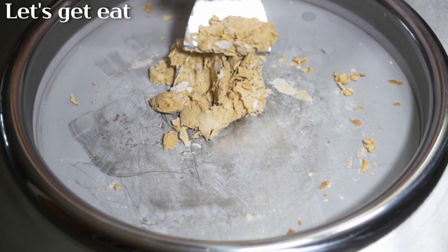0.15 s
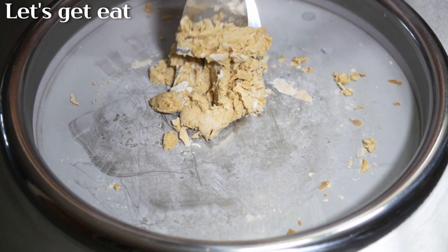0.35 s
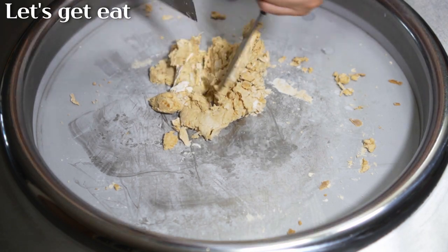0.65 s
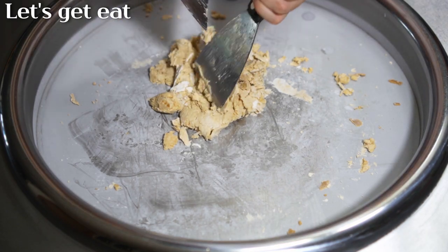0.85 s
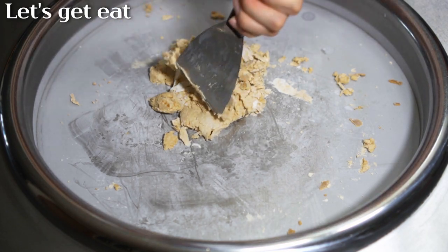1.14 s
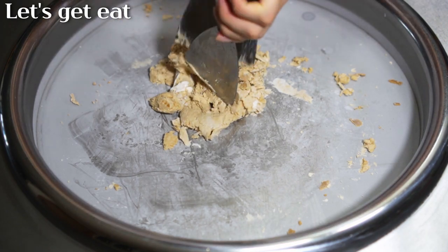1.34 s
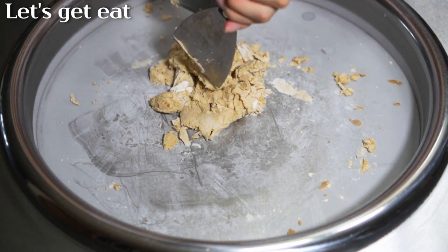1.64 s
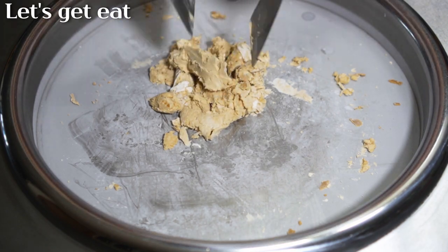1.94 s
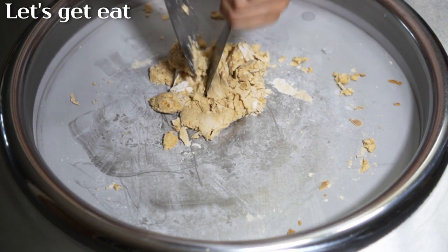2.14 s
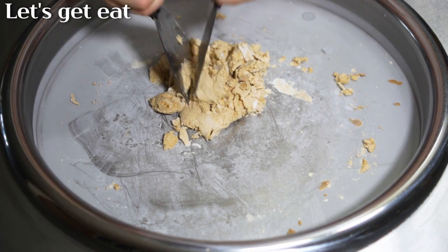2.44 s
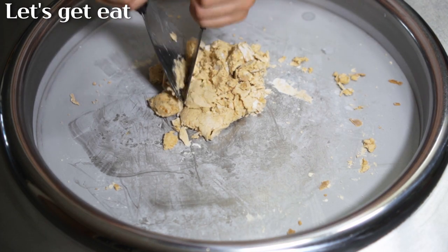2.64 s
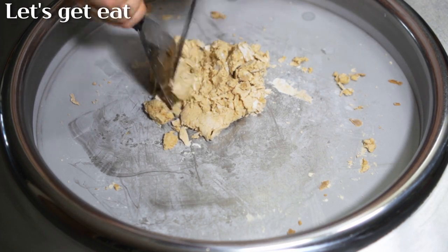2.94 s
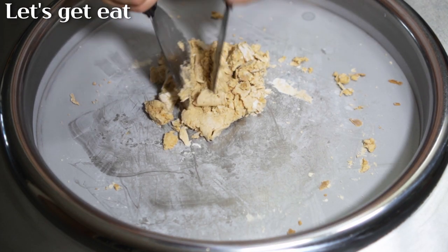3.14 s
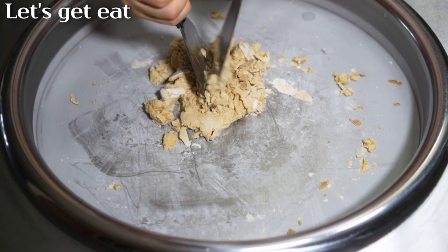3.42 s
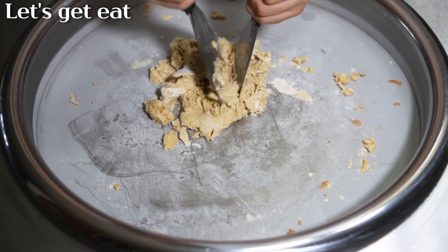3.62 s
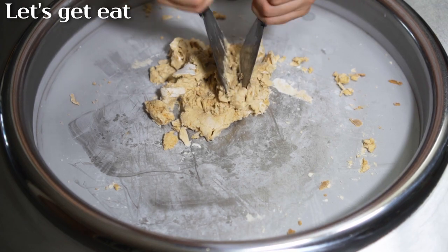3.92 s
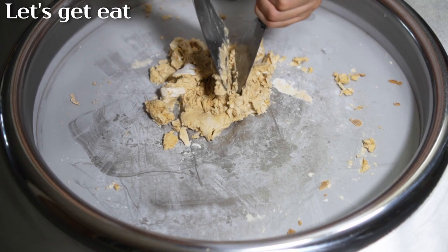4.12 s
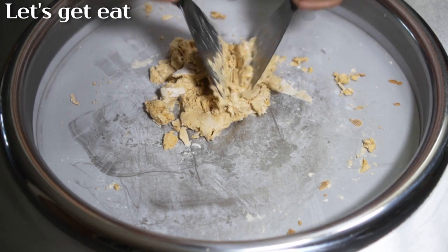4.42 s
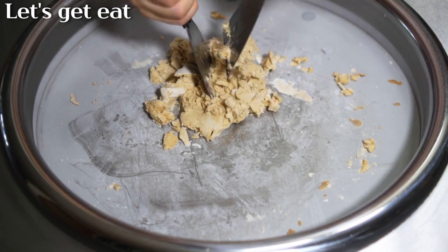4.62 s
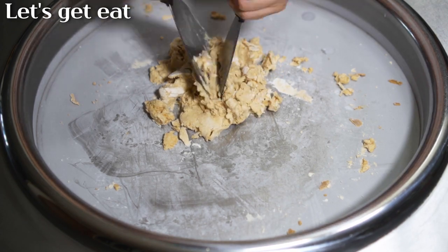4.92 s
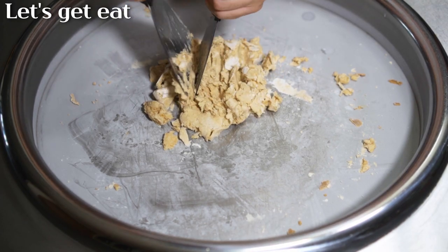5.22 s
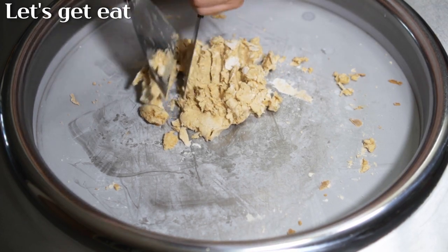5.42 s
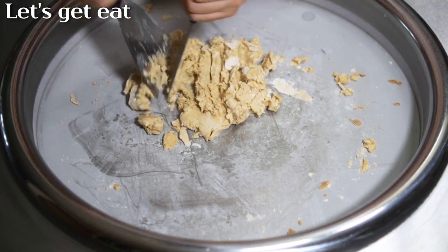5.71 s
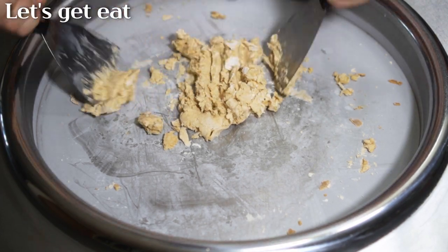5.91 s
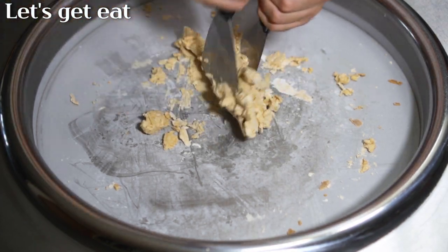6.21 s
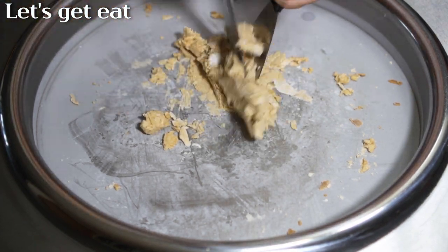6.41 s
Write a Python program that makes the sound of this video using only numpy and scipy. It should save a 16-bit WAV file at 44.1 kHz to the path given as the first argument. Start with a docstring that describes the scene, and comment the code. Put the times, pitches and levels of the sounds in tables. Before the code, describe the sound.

Close, wide stereo view of a chilled steel pan. First come isolated thin blade clinks and dry scrapes, then a busy run of hard metallic chops mixed with cushioned thumps in thick frozen paste. Short rattling slides follow the blows, and a brief metallic ring fades quickly in the room. A few gaps open, more chops follow, then only the low throbbing compressor hum and faint fan hiss remain.

```python
"""Ice cream chopped on a chilled plate

Two steel spatulas chop and scrape half-frozen ice cream on a chilled steel plate.
A blade that cuts through cracks on the steel: shaped click clusters filtered by blade modes.
One cushioned by the mixture only thuds the plate: a short swell of decaying cosines.
The cooling unit hums and hisses underneath: wavering tones and coloured noise.
Bands of the sound drift out of phase between the ears."""
import sys
import numpy as np
from scipy import signal
from scipy.fft import rfft, irfft
from scipy.io import wavfile
from scipy.ndimage import uniform_filter1d

SR = 44100
rng = np.random.default_rng(int(sys.argv[2]) if len(sys.argv) > 2 else 0)


def int16_out(signal):
    """Quantize to a 16-bit WAV file."""
    q = np.round(np.clip(np.atleast_2d(signal).T, -1, 1) * 32767)
    wavfile.write(sys.argv[1], SR, q.astype(np.int16))


N = 289296
T = np.arange(N) / SR

# Levels of blade and plate sounds are before the gains in scene().

# compressor tones: pitch_hz, level_db_rms
HUM = [(48.8, -54), (97.6, -48), (193.8, -57), (1061, -61.5)]
# fan noise: freq_hz, density_db_per_hz
FAN = [(20, -100), (33, -95), (70, -75), (140, -79.5), (190, -75.5), (320, -81.5), (450, -84), (850, -84),
       (1300, -90.5), (2000, -95.5), (3000, -99), (4600, -103), (7000, -110), (9000, -111), (15500, -123)]
# whistles of the cooling circuit: centre_hz, width_hz, boost_db
WHISTLES = [(4800, 24, 13), (6030, 79, 13.5), (8400, 150, 4.5), (9000, 120, 1), (9500, 80, -2),
            (12400, 300, 9)]
# cabinet rumble as the hands lean on it: centre_s, level_db
LEANS = [(1.3, -47), (1.65, -46.5), (2.15, -40.5), (2.5, -38), (3.27, -44), (3.78, -40), (4.16, -37.5),
         (4.96, -39), (5.18, -43.5), (5.56, -49)]
LEAN_S, RUMBLE_DB = 0.094, -72.5  # half-length of a lean; rumble at rest

# churning of the mixture between blows: time_s, level_db
CHURN = [(0, -89), (.9, -60.5), (1.85, -56.5), (2.9, -43), (3.65, -56.5), (4, -46.5), (4.5, -56),
         (5.8, -66.5), (6.56, -88)]
# colour of the churning: freq_hz, gain_db
PASTE = [(150, 4), (330, 10), (800, 3.5), (1500, 0.5), (2500, -11), (4500, -15), (6500, -26), (9000, -19),
         (12000, -27.5), (16000, -35)]

# decay of pan and room: freq_hz, t60_s
DECAY = [(150, 0.64), (400, 0.35), (1000, 0.43), (2700, 0.31), (7000, 0.33), (15000, 0.13)]

# overall colour of steel on steel: freq_hz, gain_db
STEEL = [(200, -4.5), (400, 7.5), (700, 0), (1100, -7.5), (1500, 5), (2200, -5), (4400, -11), (5300, -18),
         (7500, -15), (9300, -17), (11500, -21.5), (16000, -32)]
# resonances of a blade on the pan: centre_hz, width_hz, boost_db
BLADE = [(500, 103, 9.5), (648, 75, 4), (864, 76, 5), (1265, 65, 8.5), (1540, 89, -3), (1860, 310, 5.5),
         (2150, 41, 5.5), (2680, 660, 4), (3870, 140, 3.5), (4400, 540, 2.5), (2280, 27, 2.5),
         (2520, 40, 1), (2746, 99, 4), (2860, 49, 4.5), (3320, 36, -0.5), (3570, 47, 1.5), (4890, 78, 2),
         (6190, 110, 2.5), (7200, 130, 4), (8580, 190, 5), (9030, 120, 3), (9350, 520, 2.5),
         (10950, 390, 4), (12800, 210, 3)]
# resonances of a blade held in the air: centre_hz, width_hz, boost_db
FREE_BLADE = [(980, 120, 7.5), (1540, 130, 1.5), (2300, 120, 10), (3300, 83, 6), (3900, 140, 8.5),
              (4400, 160, 10.5), (5010, 160, 9), (6500, 200, 5), (7200, 260, 1), (8050, 140, 3),
              (9000, 160, 8), (9730, 250, 7.5), (12100, 300, 1)]

# a blade drags and chatters: start_s, length_s, level_db, chatter_hz, width_hz
SCRAPES = [(0.62, 0.13, -85, 1700, 1200), (0.88, 0.2, -69, 1600, 1500), (1.06, 0.15, -69, 1800, 1000),
           (0.3, 0.057, -46, 3500, 7500), (1.311, 0.03, -56, 2420, 3400), (0.978, 0.029, -69, 3200, 500),
           (1.349, 0.039, -38.5, 3600, 6900), (1.423, 0.12, -49.5, 4000, 8200),
           (1.425, 0.051, -57, 7600, 700), (1.443, 0.079, -55.5, 1250, 600),
           (1.475, 0.064, -53, 2000, 2000), (1.733, 0.069, -51, 3170, 6000), (1.7, 0.06, -56, 1400, 600),
           (1.837, 0.083, -58.5, 1450, 790), (1.96, 0.13, -70, 1700, 700), (2.201, 0.057, -47, 4900, 1600),
           (4.259, 0.023, -48, 5400, 2500), (2.111, 0.027, -54.5, 2100, 3500),
           (2.56, 0.03, -58, 1800, 3000), (5.175, 0.058, -43.5, 640, 300), (5.685, 0.054, -40, 2500, 1600),
           (5.503, 0.05, -39.5, 2750, 400), (3.428, 0.044, -53, 484, 270), (5.925, 0.022, -51, 610, 1100),
           (2.197, 0.16, -45.5, 1800, 4300), (2.859, 0.074, -35.5, 1880, 480),
           (2.874, 0.031, -40, 1900, 3000), (2.865, 0.04, -37.5, 920, 250), (2.6, 0.043, -45, 1080, 220),
           (3.39, 0.035, -47, 1200, 2300), (3.862, 0.04, -56, 1200, 1800), (4.062, 0.055, -41.5, 760, 690),
           (4.25, 0.045, -43, 790, 600), (5.657, 0.022, -48, 900, 1400), (3.914, 0.047, -45, 1700, 1500),
           (5.34, 0.048, -42, 1200, 160), (5.383, 0.05, -57, 7400, 3800), (5.5, 0.041, -33.5, 465, 340),
           (5.512, 0.059, -41.5, 1360, 130), (5.676, 0.06, -38, 420, 220), (5.956, 0.043, -44.5, 840, 1060),
           (5.965, 0.12, -51, 9400, 700), (5.981, 0.12, -48, 5500, 11400), (6.043, 0.018, -48, 5470, 10000),
           (6.01, 0.049, -49.5, 3900, 660)]
# after each chop the edge slides on, the louder the more it rings on
SLIDE_LAG_S, SLIDE_S, SLIDE_DB, SLIDE_HZ, SLIDE_WIDTH_HZ = .006, 0.088, -11.5, 1514, 1060

# blow cushioned by the mixture: peak_s, push_db, pitch_hz
THUDS = [(2.269, -30, 240), (2.3596, -28.5, 256), (2.6889, -23, 260), (3.043, -22, 266), (3.2193, -30, 238),
         (3.82, -30.5, 278), (3.9593, -21, 221), (4.1137, -22, 238), (4.791, -27.5, 246),
         (4.955, -27.5, 263), (5.0229, -30, 204), (5.1174, -18, 256), (5.2664, -24, 250), (5.578, -26, 234),
         (5.9943, -32, 275)]
# drum modes of the plate: pitch_hz, level_db (relative to the push), t60_s
PLATE = [(171, -21.5, 0.24), (196.1, -16.5, 0.36), (238, -20, 0.5), (306, -18, 0.12), (482, -27, 0.27)]
# each chop also pushes the plate, just after the crack
THUD_LAG_S, THUD_HZ = 0.00562, 266
# the push dies away more slowly on bare steel than under the mixture
THUD_T60_S, CUSHIONED_T60_S = 0.069, 0.06

# blades glance off each other: contact_s, crack_db, brightness_db, ring_on_db (relative),
# partials favoured by the point of contact [centre_hz, width_hz, boost_db]
CLINKS = [(0.3043, -23.5, 3.5, -25, [(1604, 110, 20), (3900, 150, 2), (8450, 200, 7), (9070, 170, 13),
          (11400, 180, 1)]), (0.452, -58.5, 11.5, -20, [(9000, 200, 4)]),
          (0.993, -50.5, -3, -26, [(3200, 200, 16)]), (1.3518, -22, 1, -16.5, [(2280, 33, 17.5),
          (3450, 130, 11), (4540, 80, -3), (9650, 90, 8)]), (1.4184, -25, 2.5, -27, [(1310, 120, 32),
          (2440, 120, 9), (4500, 130, 7), (7420, 350, 17), (12100, 400, 16), (12850, 120, 14)]),
          (1.726, -29, 4, -16, [(1470, 67, 9), (2860, 56, 13), (3900, 130, 8), (9520, 150, 13),
          (11400, 300, 7), (14030, 3000, 15)]), (2.1442, -24.5, -0.5, -16, [(915, 130, 13), (1400, 78, 6),
          (3680, 150, 12), (4330, 140, 6), (7200, 200, 15), (7900, 220, 16), (9400, 140, -3)]),
          (4.228, -28.5, 7, -18.5, [(2520, 130, 10), (4800, 110, -8), (5590, 140, 18), (8030, 320, 13),
          (10600, 190, 15)]), (5.981, -33.5, 8, -13, [(1150, 195, 9), (9030, 190, 12)])]
# blade chops through to the plate: contact_s, crack_db, brightness_db, ring_on_db (relative),
# note_hz, note_db, overtone_hz, overtone_db, boom_db (lowest band), thud_db
CHOPS = [(2.187, -21, -4, -9, 1550, 10, 4400, 9.5, -1.5, -25),
         (2.589, -20, -2.5, -15.5, 1290, 11.5, 9500, -7, -3, -21),
         (2.7633, -20.5, -1, -16.5, 1284, 6.5, 7200, -7, -3.5, -22.5),
         (2.858, -20.5, -10.5, -15, 1740, 14, 2520, 6, -6, -22),
         (2.945, -20.5, 2.5, -13, 1280, 7.5, 9500, 3, -0.5, -22.5),
         (3.0996, -20, 2.5, -13, 1300, 10, 7160, 9, 1, -21.5),
         (3.259, -26, -7.5, -21.5, 1540, 40, 3100, -6, -1.5, -23.5),
         (3.423, -29, -7, -16.5, 2230, 11, 2980, 14, 4.5, -21),
         (3.863, -42.5, -12, -21, 1450, 6, 2700, -4, -2, -35),
         (3.8983, -21.5, -6.5, -12, 1560, 7.5, 3620, 9, -2, -20),
         (4.0575, -22.5, -4.5, -13, 1860, 2, 2660, -1, -1.5, -20),
         (4.247, -22, 2, -20, 1580, 11, 3830, 3, -3.5, -24),
         (4.517, -28.5, 1.5, -19.5, 1702, 9, 2630, -15, 3, -31),
         (4.6717, -55.5, -21, -22, 606, 17, 1300, -3, 13, -22),
         (4.8674, -41.5, -10, -19, 1500, 10, 3000, 10, -6, -23.5),
         (5.183, -28, -4.5, -21, 1550, 1, 3760, 15, -2, -23),
         (5.3372, -27, 1, -19, 1290, 5, 3040, 16, 3, -22),
         (5.4122, -43, -21, -17.5, 1350, 6, 3000, -4, 3, -21.5),
         (5.499, -21, 4, -15.5, 1290, -13, 3660, 8.5, 0.5, -22),
         (5.6748, -21.5, 4, -14.5, 1410, 6, 4080, 6, 1, -21.5),
         (5.9537, -30.5, 9.5, -16, 1044, 19, 2970, 11, 8, -37)]
NOTE_WIDTH_HZ, OVERTONE_WIDTH_HZ = 110, 140  # a pressed blade rings only briefly
# noise lead-in before the peak; frequency grid of one blow
LEAD_IN_S, BLOW_HZ = .03, np.fft.rfftfreq(8192, 1 / SR) + 1
# edges of the four bands of a blow: edge_hz
BAND_EDGES_HZ = [400, 1100, 2800, 6000, 16000]
# balance of a chop, bands low to high: level_db
CHOP_DB = [0.57, -0.46, -4, -12.5]
# balance of a clink, bands low to high: level_db
CLINK_DB = [-8, -2.6, -1.4, -6.5]
# share of the brightness taken by each band: share (ratio)
BRIGHT_SHARE = [-0.4, -0.013, 0.023, 1]

# steady phase lead of the left ear: freq_hz, lead_rad
LEAD = [(20, 0.55), (450, 0.46), (3000, 0.69), (4800, 0.97), (7000, 0.78)]
# sliding bands out of phase between the ears: time_s, low_hz, high_hz, left_lead_rad
EARLY_BAND = [(0, 380, 1870, 2.51), (1.05, 370, 2140, 2.36), (1.4, 376, 1225, 2.4), (2.68, 400, 1356, 2.38),
              (3.05, 400, 550, 2.7)]
# same columns: time_s, low_hz, high_hz, left_lead_rad
LATE_BAND = [(3.1, 3430, 3760, 3.9), (3.8, 2870, 4623, 3.5), (4.08, 3100, 4250, 3.4),
             (4.44, 3320, 3950, 3.2), (4.51, 2960, 3300, 3.3), (4.6, 2460, 3450, 3.14),
             (4.8, 2300, 2890, 3.14), (5.05, 2098, 2876, 3.2), (5.12, 1996, 3500, 3.14),
             (5.45, 1530, 3300, 3.14), (5.68, 1110, 3180, 3.14), (5.83, 1410, 3100, 3.14),
             (5.961, 1154, 2450, 3.14), (6.56, 1220, 2340, 3.14)]
# same columns: time_s, low_hz, high_hz, left_lead_rad
HIGH_BAND = [(1.3, 5850, 6500, 5.3), (2.2, 5850, 6700, 4.61), (2.6, 5460, 6460, 3.4),
             (3.05, 5500, 6900, 3.2)]
# treble swings out of phase and back: time_s, left_lead_rad
TREBLE_LEAD = [(1.3, 1), (1.73, -1.4), (1.85, -2.5), (2.38, -2.5), (2.5, -0.7), (2.85, -2), (3, -2),
               (3.1, 1.24), (3.5, 0.2), (3.62, -1.5), (4.1, -1.5), (4.35, -1)]
TREBLE_HZ, EDGE_HZ = 6530, 15900  # bottom of the treble; top of the whole sound
BASS_HZ, BASS_STEP_S = 400, 3.9  # the bass stays in step until this time


def amp(db):
    """Decibels to gain."""
    return 10 ** (np.asarray(db) / 20)


def evened(x):
    """Scales to an rms of one."""
    return x / np.sqrt(np.mean(x ** 2) + 1e-20)


def read(points, hz):
    """Reads a table along a logarithmic frequency axis."""
    f, value = np.transpose(points)
    return np.interp(np.log(hz + 1), np.log(f + 1), value)


def bumps(peaks, hz):
    """Decibels added by a set of resonances."""
    return sum(db / (1 + (2 * (hz - f) / width) ** 2) for f, width, db in peaks)


def resonance(hz, centre_hz, width_hz, db):
    """Gain of one ringing mode that stands db above its surroundings."""
    return np.sqrt(1 + (amp(db) ** 2 - 1) / (1 + (2 * (hz - centre_hz) / width_hz) ** 2))


def ring(x, gain):
    """Minimum-phase filter: the given gain, with its response after the excitation."""
    log_gain = np.log(np.maximum(np.r_[gain, gain[-2:0:-1]], 1e-5))
    response = np.exp(signal.hilbert(log_gain).conj())[:len(gain)]
    return irfft(rfft(x) * response)


def add(mix, s, sound):
    """Mixes a sound in at time s."""
    part = mix[max(round(s * SR), 0):][:len(sound)]
    part += sound[:len(part)]


def clumps(count, depth_db, size):
    """An uneven gain, as when an edge catches and lets go or a draught wavers."""
    return amp(depth_db * evened(uniform_filter1d(rng.standard_normal(count), size)))


def grit(count, spread_db):
    """Grainy noise: dense clicks of very uneven size."""
    loudness = np.minimum(rng.exponential(1, count), 4)
    return rng.standard_normal(count) * amp(spread_db * loudness)


def cooler(throb_hz=2.42, throb_s=0.16, drone_hz=238, drone_db=-46.5, easing_db_per_s=0.45):
    """Compressor tones, a throbbing drone that slowly eases, fan noise and the cabinet's rumble."""
    hz = np.fft.rfftfreq(N, 1 / SR)

    def noise(gain):
        return irfft(rfft(rng.standard_normal(N)) * gain, N)

    def tone(f, waver):
        wander = waver * evened(noise(np.exp(-hz / 3)))
        return np.sqrt(2) * np.sin(2 * np.pi * (f * T + rng.random()) + wander)

    hum = sum(amp(db) * tone(f, waver=0.5 * np.sqrt(f / 50)) for f, db in HUM)

    cycle = np.cos(2 * np.pi * throb_hz * (T - throb_s))
    throb = 0.45 + 0.61 * np.tanh(1.23 * cycle + 0.14)
    drone = amp(drone_db - easing_db_per_s * T) * tone(drone_hz, waver=.35) * throb

    fan = noise(amp(read(FAN, hz) + bumps(WHISTLES, hz))) * np.sqrt(SR / 2)
    fan = fan * clumps(N, depth_db=0.7, size=9000)

    low_peak = 1 / (1 + ((hz - 50) / 13) ** 2) ** 2
    high_peak = amp(-1.0) / (1 + ((hz - 99) / 13) ** 2) ** 2
    cabinet = noise(low_peak + high_peak)
    swell = np.sqrt(uniform_filter1d(cabinet ** 2, size=8000))
    leaning = amp(RUMBLE_DB) + sum(amp(db) * np.exp(-((T - s) / LEAN_S) ** 2) for s, db in LEANS)
    return hum + drone + fan + cabinet / swell * leaning


def room(x, build_s=0.006):
    """Dense echoes of pan and room, each band dying at its own speed."""
    t = np.arange(SR) / SR
    taps = rng.choice([-1., 1.], SR) * (rng.random(SR) < .15) * np.clip(t / build_s - .5, 0, 1)
    hz, frames, z = signal.stft(taps, SR, nperseg=256)
    fading = amp(-60 * frames / read(DECAY, hz)[:, None])
    tail = signal.istft(z * fading, SR, nperseg=256)[1]
    return signal.fftconvolve(x, tail / np.linalg.norm(tail))[:N]


def alternating_room(x, count=3):
    """Three echo patterns take turns, six a second, so the tail's colour keeps changing."""
    return sum(room(x * (np.floor(T * 6) % count == k)) for k in range(count))


def churn():
    """Soft, grainy rubbing of steel through the frozen paste."""
    grains = grit(N, spread_db=5.5) * clumps(N, depth_db=3.0, size=500)
    rub = irfft(rfft(grains) * amp(read(PASTE, np.fft.rfftfreq(N, 1 / SR))), N)
    return evened(rub) * amp(np.interp(T, *np.transpose(CHURN)))


def scrapes(size=12288, bite_s=0.0046, fade=2.18):
    """Stick and slip of a dragged edge excites the blade near its chatter frequency, then fades."""
    t, hz, out = np.arange(size) / SR, np.fft.rfftfreq(size, 1 / SR), np.zeros(N)
    slides = [(s + SLIDE_LAG_S, SLIDE_S, db + ring_db + SLIDE_DB, SLIDE_HZ, SLIDE_WIDTH_HZ)
              for s, db, _, ring_db, *_ in CHOPS]
    blade = amp(bumps(BLADE, hz))
    for s, length_s, db, chatter_hz, width_hz in SCRAPES + slides:
        pressure = (1 - np.exp(-t / bite_s)) * np.exp(-fade * (t / length_s) ** 2)
        colour = blade / (1 + ((hz - chatter_hz) / width_hz * 2) ** 2)
        slips = grit(size, spread_db=7.5) * clumps(size, depth_db=2.0, size=150)
        drag = ring(pressure * slips, colour)
        add(out, s, amp(db) * drag / np.linalg.norm(drag) * np.sqrt(length_s * SR))
    return out


def tail_ticks(count=14, size=512, per_s=420, fade_s=0.027, cycles=2.9, db=-16, low_hz=1200, high_hz=5200):
    """Sparse, random short ticks that roughen the tail after a chop, at several pitches."""
    t, out = np.arange(size) / SR, np.zeros(N)
    envelope = sum(amp(crack_db) * (T > s + SLIDE_LAG_S) * np.exp(-abs(T - s) / fade_s)
                   for s, crack_db, *_ in CHOPS)
    for hz in np.geomspace(low_hz, high_hz, count):
        impulses = (rng.random(N) < per_s / count / SR) * rng.uniform(-1.06, 1, N)
        tick = np.sin(2 * np.pi * hz * t) * np.exp(-hz * t / cycles)
        out += signal.oaconvolve(impulses, tick)[:N]
    return amp(db) * envelope * evened(out)


def thuds(size=16384, rise_s=0.0088, peak_s=0.0067, scatter=0.026):
    """A soft push swells in a cycle or two and dies quickly; the plate's drum modes ring on faintly."""
    t, out = np.arange(size) / SR - peak_s, np.zeros(N)
    swell = np.sin(np.pi / 2 * np.minimum((t + peak_s) / rise_s, 1)) ** 2
    cushioned = [(s, db, hz, CUSHIONED_T60_S) for s, db, hz in THUDS]
    under_chops = [(s + THUD_LAG_S, db, THUD_HZ * (1 + scatter * rng.standard_normal()), THUD_T60_S)
                   for s, *_, db in CHOPS]
    for s, db, hz, push_t60_s in cushioned + under_chops:
        modes = sum(-amp(mode_db - 60 * t / t60_s) * np.cos(2 * np.pi * f * t)
                    for f, mode_db, t60_s in [(hz, 0, push_t60_s)] + PLATE)
        add(out, s - peak_s, amp(db) * swell * modes)
    return out


def contact_ripple(depth_db, full_hz=5000, size=32):
    """Each point of contact favours some of the blade's many upper modes and misses others."""
    ripple = uniform_filter1d(uniform_filter1d(rng.standard_normal(len(BLOW_HZ)), size), size)
    return amp(depth_db * evened(ripple) * np.minimum(BLOW_HZ / full_hz, 1))


def burst(envelope, count=2):
    """A cluster of tiny contacts with the given envelope, a nearly even spectrum and unit energy."""
    x = envelope * grit(len(envelope), spread_db=4)
    for _ in range(count):
        x = irfft(np.exp(1j * np.angle(rfft(x))))  # flatten the spectrum
        x = x * envelope / np.sqrt(abs(uniform_filter1d(x ** 2, size=96)) + 1e-20)
    return x / np.linalg.norm(x)


def crack(colour, levels_db, lowest_hz, crack_s=0.0032, lead_in=0.26, lead_in_fade_s=0.012):
    """Swells in over a few milliseconds of grainy noise to a peak, filtered by the steel's colour."""
    t, gain = np.arange(len(BLOW_HZ) * 2 - 2) / SR - LEAD_IN_S, 0
    for db, lo, hi in zip(levels_db, [lowest_hz] + BAND_EDGES_HZ[1:], BAND_EDGES_HZ[1:]):
        band = colour / np.sqrt((1 + (lo / BLOW_HZ) ** 10) * (1 + (BLOW_HZ / hi) ** 10))
        gain = np.hypot(gain, amp(db) * evened(band))
    pre_noise = np.exp(-abs(t) / lead_in_fade_s) * (t < 0) * grit(len(t), spread_db=4.5)
    contact = burst(np.exp(-.5 * (t / crack_s) ** 2))
    blow = contact + lead_in * pre_noise / np.linalg.norm(pre_noise)
    return ring(blow, gain) * np.sqrt(0.0046 * SR)


def clinks(ripple_db=3.0):
    """Blades glance off each other, free to ring, hardly stirring the pan: (s, sound, ring-on dB)."""
    steel = amp(read(STEEL, BLOW_HZ) + bumps(FREE_BLADE, BLOW_HZ))
    for s, db, bright_db, ring_db, partials in CLINKS:
        favoured = np.prod([resonance(BLOW_HZ, *partial) for partial in partials], axis=0)
        colour = steel * contact_ripple(ripple_db) * favoured
        levels_db = db + np.array(CLINK_DB) + bright_db * np.array(BRIGHT_SHARE)
        yield s, crack(colour, levels_db, lowest_hz=700, lead_in=0.19), ring_db


def chops(ripple_db=4.5):
    """Cracks on the plate, each with its own note, overtone and upper ripple: (s, sound, ring-on dB)."""
    steel = amp(read(STEEL, BLOW_HZ) + bumps(BLADE, BLOW_HZ))
    for s, db, bright_db, ring_db, note_hz, note_db, over_hz, over_db, boom_db, _ in CHOPS:
        note = resonance(BLOW_HZ, note_hz, NOTE_WIDTH_HZ, note_db)
        overtone = resonance(BLOW_HZ, over_hz, OVERTONE_WIDTH_HZ, over_db)
        colour = steel * contact_ripple(ripple_db) * note * overtone
        levels_db = db + np.array(CHOP_DB) + bright_db * np.array(BRIGHT_SHARE)
        levels_db[0] += boom_db
        yield s, crack(colour, levels_db, lowest_hz=411), ring_db


def scene():
    """Blades, plate and cooler, heard from one spot."""
    cracks, ringing = np.zeros((2, N))
    for s, sound, ring_db in [*chops(), *clinks()]:
        add(cracks, s - LEAD_IN_S, sound)
        add(ringing, s - LEAD_IN_S, sound * amp(ring_db))
    plate, drags = thuds(), scrapes() + tail_ticks() + churn()
    echoes = alternating_room(amp(7.0) * ringing + amp(-10) * plate + amp(-8.0) * drags)
    direct = amp(-3.5) * cracks + amp(1.5) * plate + amp(1.0) * drags
    mono = direct + echoes + cooler()
    return np.array([mono, mono])


def record(dry, pull=0.072, blow_db=-35, shimmer=0.035):
    """The ears drift out of phase in sliding bands; then a low-pass limits the band."""
    hz, t, z = signal.stft(dry, SR, nperseg=1024, noverlap=768)
    f = hz[:, None]
    treble_lead = np.interp(t, *np.transpose(TREBLE_LEAD))
    steady_lead = read(LEAD, f) * ((f > BASS_HZ) | (t > BASS_STEP_S))
    lead = np.where(f > TREBLE_HZ, treble_lead, steady_lead)
    for band in EARLY_BAND, LATE_BAND, HIGH_BAND:
        s, *columns = np.transpose(band)
        low, high, radians = (np.interp(t, s, c) for c in columns)
        inside = (f > low) & (f < high) & (t >= s[0]) & (t <= s[-1])
        lead = np.where(inside, radians, lead)

    # a loud blow draws the ears toward the nearest point of being in step and adds to the shimmer
    blow = np.tanh(np.sum(abs(z[0, hz > 2000]) ** 2, axis=0) / amp(blow_db) ** 2)
    flicker = evened(uniform_filter1d(rng.standard_normal(lead.shape), size=2, axis=1))
    drawn = pull * blow * np.angle(np.exp(1j * lead))
    lead = lead - drawn + (shimmer + 0.066 * blow) * flicker

    smooth_lead = uniform_filter1d(uniform_filter1d(lead, size=3, axis=0), size=3, axis=1)
    turn = np.exp(.5j * smooth_lead)  # half the lead to each ear
    turned = z * np.array([turn, turn.conj()])
    wide = signal.istft(turned, SR, nperseg=1024, noverlap=768)[1][:, :N]
    lowpass = signal.firwin(511, EDGE_HZ, window=("kaiser", 9), fs=SR)
    return signal.oaconvolve(wide, lowpass[None], "same")


dry = scene()
out = record(dry)
int16_out(out)
```